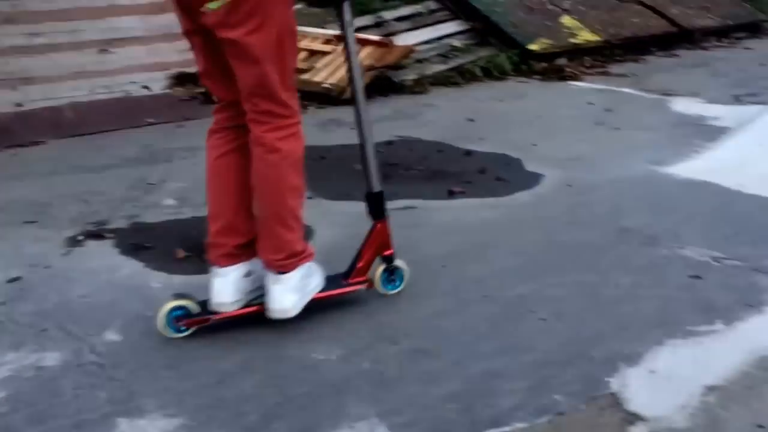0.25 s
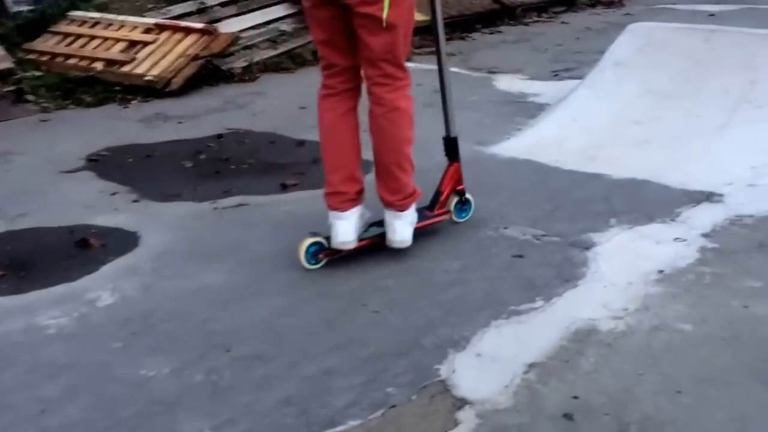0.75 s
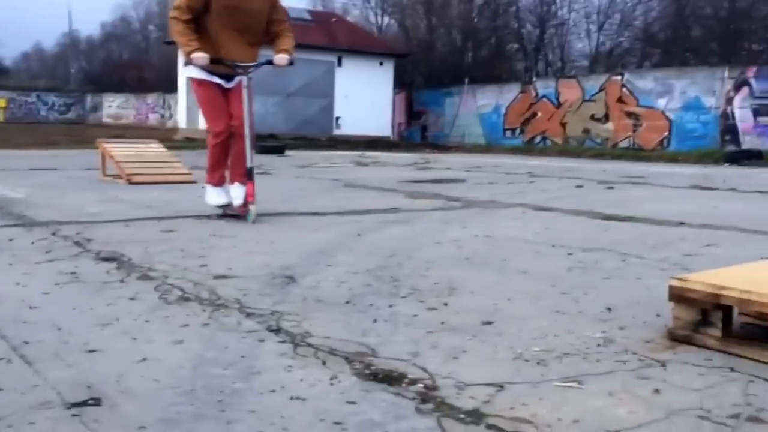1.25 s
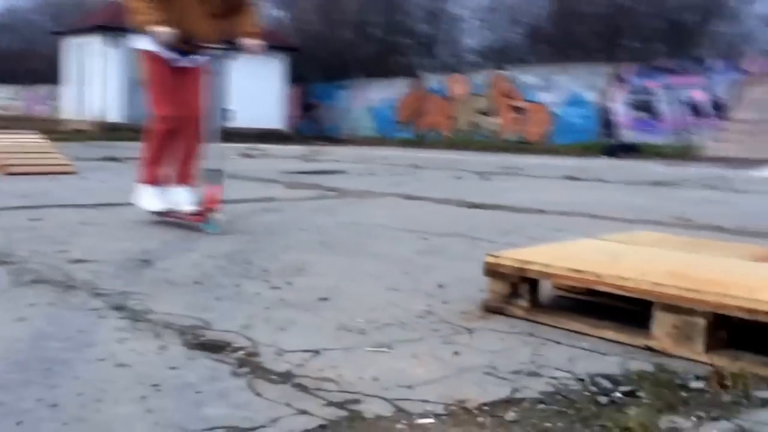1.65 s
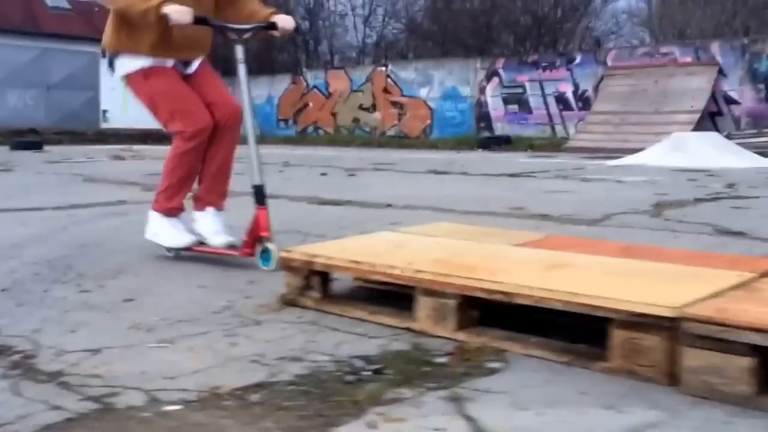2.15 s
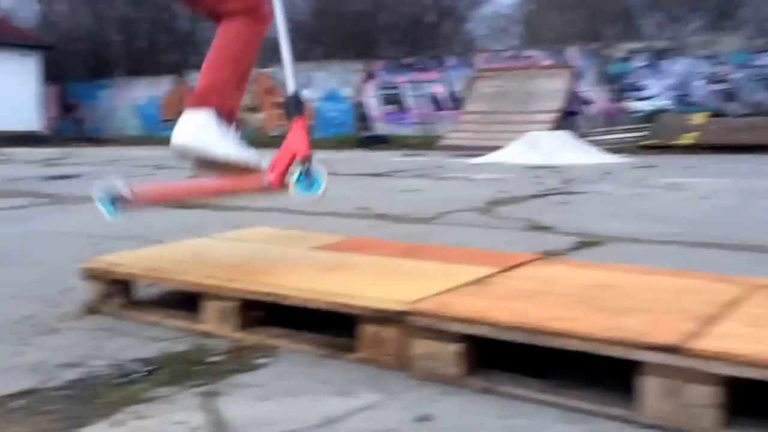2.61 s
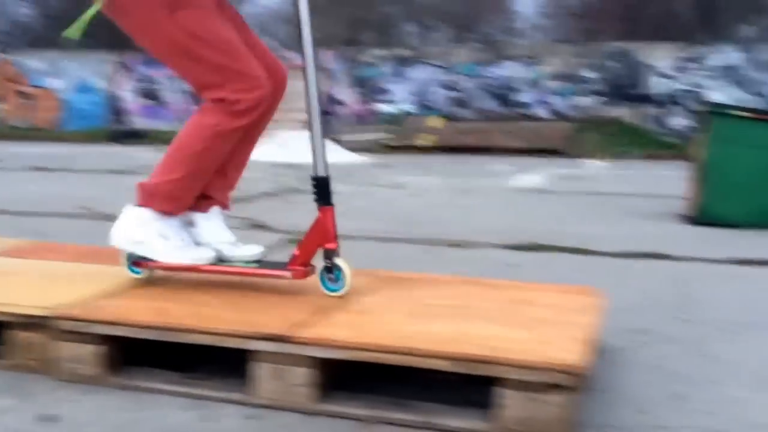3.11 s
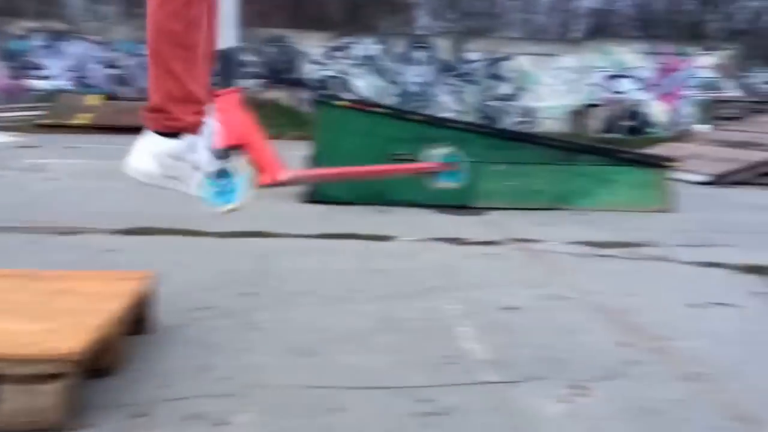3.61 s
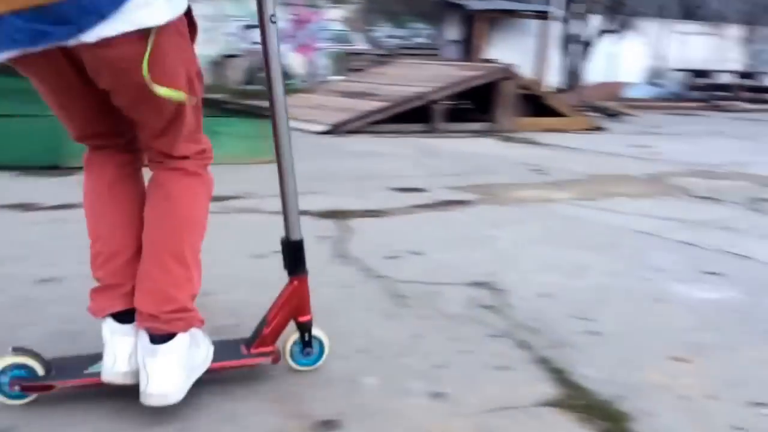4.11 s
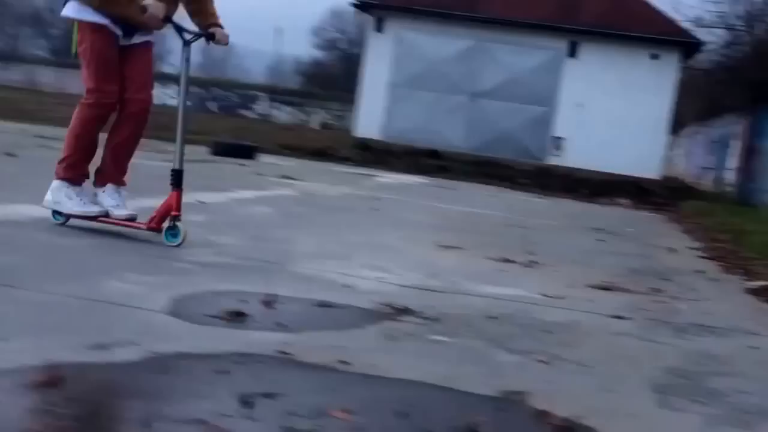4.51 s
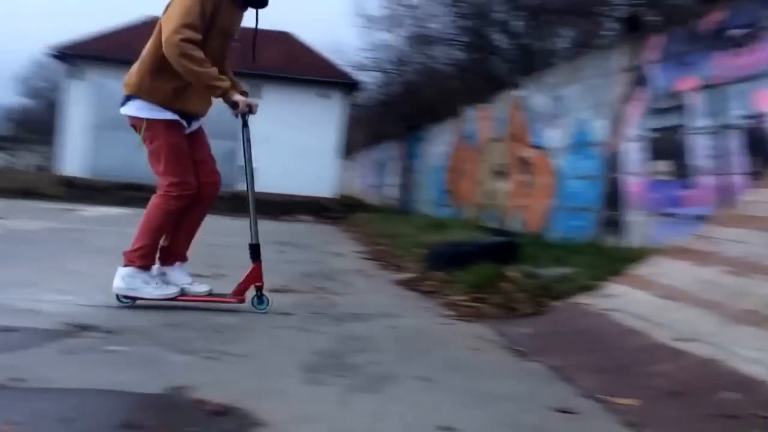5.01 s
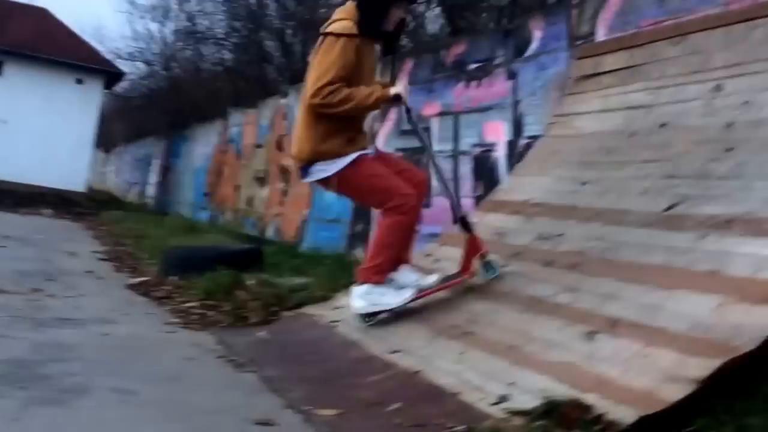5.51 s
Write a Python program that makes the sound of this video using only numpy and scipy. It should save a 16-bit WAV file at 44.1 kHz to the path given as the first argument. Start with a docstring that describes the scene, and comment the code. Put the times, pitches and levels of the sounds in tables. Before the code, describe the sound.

In an open yard with faint background noise, a stunt scooter is heard close and dry. From 0 to 1 s it rolls softly, with bright grit ticks, tiny scrapes and a barely audible thin squeak near 0.47 s. From 1 to 2.2 s low bumps over cracks and a light bearing whir continue. At 2.3 s it hops, the metal frame rattling, and lands at about 2.75 s with a hollow woody clack and knock on pallets. Boards drone, with bumps near 3.1 s and a knock at 3.4 s. A second jump at 3.5 s jangles unevenly, then a hard cracking landing hits asphalt at 3.96-4.0 s. Crunchy ticks and a strong low thump follow at 4.3-4.5 s, then steadier gritty rolling. At 5.3 s a sharp knock meets the plank ramp; from 5.45 s heavy booming thuds and deep rumble, the loudest part, last to the end. Short dull echoes follow the hits.

```python
"""A stunt scooter rolls over rough asphalt in an open yard, hops onto wooden pallets, drops off and runs up a plank ramp.
From the start, shaped noise and random clicks give rumble, drone, frame shake, whir and grit over the yard's faint noise.
Bursts of hiss tick, decaying sines bump, and a thin falling sine squeaks once, early on.
In the jumps rattles excite the frame's modes; landings knock and ring pallet, then asphalt, then ramp.
Ticks, jolts and landings return as dull, delayed echoes from ground and walls."""
import sys
import numpy as np
from scipy import signal
from scipy.fft import rfft, irfft, next_fast_len
from scipy.io import wavfile

SR = 44100
rng = np.random.default_rng(int(sys.argv[2]) if len(sys.argv) > 2 else 0)


def waveform_to_disk(signal):
    """Save audio, clipped to [-1, 1], as 16-bit WAV at the path in sys.argv[1]."""
    frames = np.transpose(np.atleast_2d(signal))
    scaled = np.clip(frames, -1, 1) * 32767
    samples = np.round(scaled).astype(np.int16)
    wavfile.write(sys.argv[1], SR, samples)


N = 253575

# colour of crushed grit, shared by crunch, ticks and cracks: frequency_hz, relative_db
GRIT_SPECTRUM = [(2000, -9), (3500, -6.5), (5200, -1), (6000, -1.5), (7700, 0.5), (9000, -3), (12500, -6.5),
                 (14800, -10), (15600, -4)]
# course of the grit and the bearing whir: time_s, grit_db, whir_db
CRUNCH_COURSE = [(0, -62.5, -58), (.27, -53, -62), (.3, -71, -64), (1, -66.5, -69), (1.6, -69.5, -63),
                 (2.05, -61.5, -53.5), (2.28, -65.5, -52.5), (2.32, -60.5, -56.5), (2.72, -59, -55.5),
                 (2.9, -71, -61), (3.07, -73, -64), (3.11, -64.5, -59), (3.4, -58.5, -55),
                 (3.5, -45, -45.5), (3.62, -56.5, -59), (3.92, -59.5, -58), (4.04, -43, -50),
                 (4.2, -54.5, -61), (4.26, -62, -61), (4.3, -45.5, -44.5), (4.5, -45.5, -54),
                 (4.53, -56, -64), (4.62, -55, -52), (4.85, -53.5, -52), (5.28, -47.5, -49),
                 (5.42, -51.5, -54), (5.55, -58, -55), (5.75, -61.5, -61)]


def amp(db):
    """Level law: decibels to an amplitude ratio."""
    return 10 ** (np.asarray(db, float) / 20)


def rms_one(x):
    """Normalization: divides a signal by its root mean square."""
    return x / np.sqrt(np.mean(x ** 2) + 1e-20)


def drift(rate_hz):
    """Low-pass noise: a double pole leaves slow random swings of rms 1."""
    r = np.exp(-2 * np.pi * rate_hz / SR)
    noise = rng.standard_normal(N + SR)
    settled = signal.lfilter([1], [1, -2 * r, r * r], noise)[SR:]
    return rms_one(settled)


def colour(x, spectrum):
    """Spectral shaping: weights the Fourier components of x, then sets its rms to 1."""
    hz, db = np.transpose(spectrum)
    size = next_fast_len(N)
    f = np.maximum(np.arange(size // 2 + 1) * SR / size, 1)
    gain = amp(np.interp(np.log(f), np.log(hz), db))
    return rms_one(irfft(rfft(x, size) * gain, size)[:N])


def band(x, low_hz, high_hz):
    """Band-pass filtering: keeps the part between two corner frequencies."""
    return signal.sosfilt(signal.butter(2, [low_hz, high_hz], "band", fs=SR, output="sos"), x + 1e-18)


def soften(x, order, corner_hz):
    """Low-pass filtering: rounds off a blow by removing its treble."""
    return signal.sosfilt(signal.butter(order, corner_hz, fs=SR, output="sos"), x + 1e-18)


def ring(force, hz, t60):
    """Damped resonance: a unit click starts a sine of initial height 1 that falls 60 dB in t60 seconds."""
    r, w = amp(-60 / (t60 * SR)), 2 * np.pi * hz / SR
    return signal.lfilter([0, np.sin(w)], [1, -2 * r * np.cos(w), r * r], force + 1e-18)


def grains(per_s, spread_db):
    """Random impact train: clicks of either sign at chance times; spread_db makes their sizes uneven."""
    sizes = amp(spread_db * np.minimum(rng.exponential(1, N), 4)) * rng.choice([-1, 1], N)
    return sizes * (rng.random(N) < per_s / SR)


def fading(times_s, db, t60_s, rise_s):
    """Exponential decay: sums envelopes that rise at each time and die away."""
    out = np.zeros(N)
    for s, peak, decay in zip(times_s, amp(db), t60_s):
        decay = max(decay, .002)
        i, t = round(s * SR), np.arange(round(1.5 * decay * SR)) / SR
        envelope = peak * (1 - np.exp(-t / rise_s)) * amp(-60 * t / decay)
        out[i:i + len(t)] += envelope[:N - i]
    return out


def in_time(rows):
    """Linear interpolation: spreads each level column over the samples."""
    s, *columns = np.transpose(rows)
    return [np.interp(np.arange(N) / SR, s, c) for c in columns]


def yard_noise():
    """Stationary noise: a fixed spectrum gives the faint background of the open yard."""
    # colour of the yard: frequency_hz, relative_db
    yard_spectrum = [(18, -33), (30, -28), (93, -3.5), (152, -2.5), (328, -7.5), (383, -6), (1250, -14.5),
                     (1880, -16), (2920, -34), (4400, -26.5), (14000, -48)]
    return amp(-55.5) * colour(rng.standard_normal(N), yard_spectrum)


def scrapes():
    """Sliding friction: grinding over patches of grit lifts the level, in dB, with a quick edge at each end."""
    # wheels or shoes grind over grit: start_s, length_s, rise_db
    patches = [(.005, 0.021, 8), (0.061, 0.016, 15), (0.207, 0.014, 15), (0.242, 0.023, 8.5),
               (.435, 0.018, 6), (0.547, .022, 20.5), (0.646, 0.039, 17), (0.774, 0.017, 14.5),
               (1.146, 0.039, 13), (1.356, 0.061, 21), (1.696, 0.039, 12), (1.926, 0.02, 7),
               (2.297, 0.045, 15), (2.354, 0.026, 7), (2.45, 0.044, 10), (2.606, 0.045, 4),
               (2.941, 0.023, 12), (2.988, .02, 7.5), (3.11, 0.04, 11), (3.195, 0.027, 8.5),
               (3.519, 0.072, 9), (3.68, 0.099, 8.5), (4.364, .04, 10), (4.476, 0.044, 1.5),
               (4.551, 0.057, 12.5), (5.569, 0.069, 10.5)]
    edge_s = 0.0024
    t = np.arange(N) / SR
    rise_db = np.zeros(N)
    for s, length, db in patches:
        corners = [s - edge_s, s, s + length, s + length + 2 * edge_s]
        rise_db += db * np.interp(t, corners, [0, 1, 1, 0])
    return rise_db


def frame(force, flicker_db):
    """Modal response: the hollow deck, fork and bar ring, each mode under its own randomly flickering force."""
    # modes of the metal frame: frequency_hz, relative_db, t60_s
    frame_modes = [(560, 0.5, 0.029), (645, -1.5, 0.069), (974, 0.5, 0.028), (1156, 3.5, 0.029),
                   (1400, -0.5, 0.019), (1590, -4, 0.04), (1896, -5.5, 0.027), (2480, -1, 0.0082),
                   (2906, -10, 0.064), (3660, -4.5, 0.013), (3860, -32, 0.46), (834.5, -10, 0.14)]
    out = np.zeros(N)
    for k, (hz, db, t60) in enumerate(frame_modes):
        flicker = amp(db + flicker_db * drift(29.6))
        out += (-1) ** k * flicker * ring(force, hz, t60)
    return out


def rolling():
    """Roughness excitation: stones under the wheels drive rumble, board drone, frame shake, whir and grit."""
    # colour of the ground rumble: frequency_hz, relative_db
    rumble_spectrum = [(25, -26), (45, 7.5), (70, 13.5), (110, 7.5), (160, 7), (230, -4.5), (400, -74)]
    # colour of the drone of the boards: frequency_hz, relative_db
    drone_spectrum = [(100, -22), (160, 9.5), (200, 7), (320, 3.5), (450, -2.5), (800, -8), (1300, -48.5)]
    # colour of the broad part of the shake: frequency_hz, relative_db
    shake_spectrum = [(300, 3), (500, 11.5), (1000, 5), (1600, 10.5), (2200, -51)]
    # colour of the bearing whir: frequency_hz, relative_db
    whir_spectrum = [(1500, -19), (2100, -7), (2550, -2), (2820, -1.5), (2900, 7.5), (2990, 0.5),
                     (3650, -6.5), (4200, -16), (5500, -18)]
    # course of the rumble and the drone above it: time_s, rumble_db, drone_db
    load_course = [(0, -47.5, -62), (.95, -51, -58), (1.1, -44, -55), (1.55, -55, -59.5), (1.9, -44, -50.5),
                   (2.2, -47, -47.5), (2.31, -72, -45), (2.45, -61, -63), (2.72, -48, -50),
                   (2.9, -50, -46.5), (3.06, -42, -56.5), (3.11, -44, -42), (3.38, -38, -32),
                   (3.505, -36, -33), (3.53, -48, -41), (3.6, -44, -62), (3.72, -74, -69), (3.94, -83, -49),
                   (4.05, -29.5, -49), (4.15, -39, -45.5), (4.25, -49, -64), (4.31, -37, -44.5),
                   (4.55, -50, -48), (4.85, -39.5, -46), (5.28, -42.5, -42), (5.37, -33, -26),
                   (5.42, -27, -30), (5.5, -10.5, -24.5), (5.6, -16, -27), (5.7, -15.5, -30.5),
                   (5.75, -23, -35)]
    # course of the frame shake: time_s, shake_db
    shake_course = [(0, -54), (1, -56.5), (1.6, -57), (2.02, -54), (2.27, -50.5), (2.3, -34.5), (2.45, -33),
                    (2.62, -47.5), (2.72, -41), (2.9, -57), (3.06, -66), (3.11, -53), (3.38, -45),
                    (3.51, -37), (3.53, -31.5), (3.66, -36), (3.92, -44), (4.05, -46), (4.12, -61),
                    (4.55, -55), (4.65, -45), (4.83, -43), (5.28, -39.5), (5.4, -40), (5.55, -47),
                    (5.75, -46)]

    rumble_db, drone_db = in_time(load_course)
    shake_db, = in_time(shake_course)
    grit_db, whir_db = in_time(CRUNCH_COURSE)
    rise_db = scrapes()
    grit_db = grit_db + rise_db
    whir_db = whir_db + 0.53 * rise_db  # the whir follows a scrape by about half

    lumps, patches, swells = drift(32), drift(55), drift(11.3)
    low_sway_db = 2.0 * lumps + 1.2 * swells
    rumble = colour(rng.standard_normal(N), rumble_spectrum) * amp(rumble_db + low_sway_db)
    drone = colour(rng.standard_normal(N), drone_spectrum) * amp(drone_db + low_sway_db)

    stones = rms_one(grains(4000, spread_db=2.5))
    modal_shake = amp(-2.5) * rms_one(frame(stones, flicker_db=5.0))
    broad_shake = amp(-8.5) * colour(stones, shake_spectrum)
    shake = (modal_shake + broad_shake) * amp(shake_db + 0.49 * lumps + 2.4 * swells)

    whir = colour(grains(2000, spread_db=1.5), whir_spectrum)
    whir = whir * amp(whir_db + 2.0 * patches + 0.6 * swells)
    crunch = rms_one(grains(980, spread_db=3.5)) + 0.87 * rng.standard_normal(N)
    grit = colour(crunch, GRIT_SPECTRUM) * amp(grit_db + 3.14 * patches + 2.1 * swells)
    return rumble + drone + shake + whir + grit


def small_ticks():
    """Poisson arrivals: fainter ticks fall at random, their levels tied to the grit's course."""
    per_s, over_grit_db, t60_s = 19, 10.5, 0.024
    when, size, pitch = rng.random((150, 3)).T
    s = np.cumsum(-np.log(1 - when)) / per_s
    course_s, grit_db = np.transpose(CRUNCH_COURSE)[:2]
    db = np.interp(s, course_s, grit_db) + over_grit_db + 8 * size
    hz = 5000 + 4000 * pitch
    return [(a, b, c, t60_s) for a, b, c in zip(s, db, hz) if a < N / SR - .13]


def ticks():
    """Resonant impact: loose parts and stones give a burst of hiss with a wide and a faint narrow peak."""
    # loose parts and stones tick: start_s, relative_db, centre_hz, t60_s
    tick_rows = [(.062, -28.5, 6830, .045), (0.073, -22.5, 6870, 0.023), (.132, -26.5, 6660, 0.045),
                 (.1615, -32, 7200, 0.033), (.179, -28, 4930, 0.028), (0.206, -29.5, 5230, 0.066),
                 (0.2432, -22.5, 6600, 0.059), (.2694, -26, 5260, .014), (0.446, -37, 5600, .026),
                 (0.9269, -28.5, 3840, 0.019), (1.1428, -35, 9940, 0.045), (1.3618, -31, 7900, 0.018),
                 (1.671, -39.5, 6000, 0.048), (1.708, -33.5, 4000, 0.081), (2.015, -34, 4100, 0.099),
                 (2.144, -41.5, 7460, 0.028), (2.2036, -39, 6040, .04), (2.306, -32, 5300, 0.076),
                 (2.377, -31, 5560, 0.054), (2.5144, -32, 5500, 0.045), (2.8275, -38.5, 10800, 0.066),
                 (2.9382, -37.5, 6170, 0.023), (3.496, -33, 7600, 0.073), (3.522, -38, 6030, .04),
                 (3.628, -37.5, 5920, 0.08), (3.731, -30.5, 6140, 0.11), (3.7562, -23.5, 4930, 0.05),
                 (3.9502, -15, 4200, 0.077), (3.951, -11.5, 4940, 0.04), (4.1558, -28, 6950, .03),
                 (4.211, -31.5, 8750, 0.031), (4.285, -24.5, 9900, .013), (4.308, -14, 7650, 0.031),
                 (4.354, -23.5, 4960, .017), (4.37, -21, 8100, .035), (4.384, -23, 7700, 0.016),
                 (4.433, -27.5, 9050, 0.033), (4.4543, -29, 8650, 0.022), (4.4924, -27, 7800, 0.045),
                 (4.552, -24, 7700, .03), (4.574, -24, 7660, 0.031), (4.8516, -27.5, 8400, 0.017),
                 (4.9445, -28, 6350, .015), (4.973, -29, 9400, 0.053), (5.001, -26, 9300, 0.023),
                 (5.0789, -38.5, 8260, 0.11), (5.11, -29, 5650, .033), (5.6138, -34, 6740, 0.06)]
    out, hiss = np.zeros(N), colour(grains(9000, spread_db=7.5), GRIT_SPECTRUM)
    t = np.arange(SR // 8) / SR
    edge = (1 + 0.62 * np.exp(-t / 0.00073)) * (1 - np.exp(-t / 0.00072))  # a sharp click at the front
    for s, db, hz, t60 in list(tick_rows) + small_ticks():
        i = round(s * SR)
        burst = hiss[i:i + len(t)] * amp(db - 60 * t / t60) * edge
        wide, narrow = ring(burst, hz, 0.00039), ring(burst, hz, 0.0077)
        out[i:i + len(t)] += 0.12 * burst + 0.22 * wide + 0.051 * narrow
    return out


def bumps():
    """Damped oscillation: a soft push on tyre and ground gives a few low cycles and a dull knock."""
    # wheels over cracks and seams: start_s, level_db, pitch_hz
    bump_rows = [(.07, -29.5, 191), (0.559, -38, 190), (.68, -35, 256), (1.065, -30.5, 61.9),
                 (1.168, -24, 74.4), (1.202, -23.5, 101), (1.256, -27.5, 62), (1.37, -28.5, 71.6),
                 (1.441, -23.5, 415), (1.497, -31, 72), (1.675, -29, 126), (1.781, -28, 157),
                 (1.913, -34, 76), (1.999, -37, 64), (2.096, -27, 216), (2.203, -28, 270),
                 (2.301, -22, 149), (2.933, -29, 202), (3.095, -22.5, 135), (3.112, -17.5, 298),
                 (3.194, -24, 182), (4.03, -36, 90), (4.302, -29, 186), (4.366, -10, 101.4),
                 (4.49, -26, 102), (5.081, -30, 86.6)]
    cycles = 8.5  # periods in which a bump falls 60 dB
    knock_db, knock_t60_s = -14.5, 0.045  # level relative to the bump
    out, t = np.zeros(N), np.arange(SR // 4) / SR
    for s, db, hz in bump_rows:
        i = round(s * SR)
        envelope = amp(db - 60 * t * hz / cycles) * (1 - np.exp(-t / 0.0015))
        out[i:i + len(t)] += envelope * np.sin(2 * np.pi * hz * t)
    s, db, _ = np.transpose(bump_rows)
    knock = fading(s, db + knock_db, np.full(len(s), knock_t60_s), rise_s=0.0029)
    return out + knock * rms_one(band(rng.standard_normal(N), 160, 740))


def squeak():
    """Frequency glide: the phase of a thin falling sine is the running sum of its frequency."""
    # the squeak, one row: start_s, end_s, from_hz, to_hz, peak_db
    glide = (0.455, 0.495, 7700, 6900, -60)
    start, end, from_hz, to_hz, db = glide
    part = np.clip((np.arange(N) / SR - start) / (end - start), 0, 1)
    phase = 2 * np.pi * np.cumsum(from_hz + (to_hz - from_hz) * part) / SR
    return amp(db) * np.sin(np.pi * part) * np.sin(phase)


def jolts():
    """Forced modal vibration: short rattles at uneven gaps excite the frame as the deck spins in a jump."""
    # jumps: start_s, length_s, first_jolt_relative_db
    jumps = [(2.297, .36, -23), (3.52, .38, -20)]
    # the hardest jolts, heard one by one: start_s, relative_db
    hard_jolts = [(2.322, -19), (2.435, -29), (2.482, -26.5), (2.515, -28), (2.607, -23), (2.629, -24.5),
                  (3.522, -18), (3.55, -20.5), (3.62, -19), (3.68, -19), (3.75, -20.5), (3.783, -24),
                  (3.82, -27)]
    gap_s, t60_s, fade_db_per_s, spread_db = 0.041, 0.04, 34.5, 4
    rows = list(hard_jolts)
    for start, span, first_db in jumps:
        gap, size = rng.random((30, 2)).T
        after = gap_s * (np.cumsum(0.408 + 1.2 * gap) - .4 - 1.31 * gap[0])  # the first falls near the start
        db = first_db - fade_db_per_s * after - spread_db * size
        rows += [(start + a, b) for a, b in zip(after, db) if a < span]
    s, db = np.transpose(rows)
    envelope = fading(s, db, np.full(len(s), t60_s), rise_s=0.0054)
    rattle = rms_one(grains(6000, spread_db=0.0))
    return amp(-25) * frame(envelope * rattle, flicker_db=4.5)


def landings(start, end, body, soft_hz, snap_hz):
    """Impact excitation: a snap and a rattle, dying faster in the treble, ring the frame; a soft push rings the body."""
    # blows of wheels and deck, levels relative:
    # start_s, knock_db, clack_db, crack_db, body_db, snap_db
    blows = [(2.742, -8, -9, -17, -15.5, -5.5), (2.747, -13, -7.5, -20.5, -38, -6.5),
             (2.759, -25, -42, -58, -21, -24), (2.777, -2.5, -38, -32, -10.5, -9.5),
             (2.863, -28, -47, -51, -30, -39), (3.198, -25, -30, -49, -35, -34),
             (3.4125, -8, -38, -37, -21, -3.5), (3.9585, -9.5, -33, -18, -14, -4),
             (3.98, -13, -7.5, -18.5, -10.5, -11), (3.984, -6, -17, -16, -4.5, -16),
             (3.993, -21, -15, -20.5, -9.5, -16), (4.004, -14, -23, -31, -27, -20),
             (4.015, -21, -20, -30, -34, -27), (4.3645, -32.5, -50, -42, -15, -36),
             (5.307, -29, -17.5, -17.5, -34, -36), (5.328, -4.5, -10.5, -15, -25, 1.5),
             (5.446, -8, -22, -28, -19, -19), (5.451, -2.5, -11, -15, -6, -3.5),
             (5.469, -11.5, -14.5, -28.5, -3, -16), (5.578, -14, -25, -31.5, -24.5, -37),
             (5.665, -24, -34, -44.5, -14.5, -47)]
    core_lag_s = .0015  # low rattle, snap and body push start slightly after the treble rattle and crack
    chosen = [row for row in blows if start < row[0] < end]
    s, knock_db, clack_db, crack_db, body_db, snap_db = np.transpose(chosen)
    t60_s = np.full(len(s), 0.035)
    core_s = s + core_lag_s
    at = np.round(core_s * SR).astype(int)

    rattle = rms_one(grains(5000, spread_db=-0.5))
    low = fading(core_s, knock_db, 1.5 * t60_s, rise_s=0.00175) * rattle
    high = fading(s, clack_db, t60_s, rise_s=0.0025) * rattle
    snap, push = np.zeros((2, N))
    snap[at], push[at] = amp(snap_db + 21), amp(body_db)
    snap = soften(band(snap, 290, 2670), 4, snap_hz)

    knock = amp(11.5) * band(band(low, 230, 860), 246, 3750)
    clack = amp(8.5) * band(high, 1500, 3140)
    frame_ring = amp(-34.5) * frame(high + 0.64 * snap, flicker_db=2.0)
    crack = fading(s, crack_db, 1.1 * t60_s, rise_s=0.00097) * colour(rng.standard_normal(N), GRIT_SPECTRUM)

    push = soften(push, 2, soft_hz)
    body_ring = np.zeros(N)
    for k, (hz, db, t60) in enumerate(body):
        body_ring += (-1) ** k * amp(db + 0.5) * ring(push, hz, t60)
    return knock + clack + snap + frame_ring + crack + body_ring


def reflections(hits):
    """Specular reflection: ground and walls return delayed copies with softened treble."""
    # echoes: delay_s, relative_db
    echo_rows = [(.011, -15.5), (.023, -19.5), (.041, -26), (.067, -33.5), (0.107, -34.5)]
    dull, echoes = signal.lfilter([.4], [1, -.6], hits), np.zeros(N)
    for s, db in echo_rows:
        delay = round(s * SR)
        echoes[delay:] += amp(db) * dull[:N - delay]
    return echoes


def scene():
    """Superposition: sums the sources and the echoes of ticks, jolts and landings."""
    # modes of the wooden pallets: frequency_hz, relative_db, t60_s
    pallet = [(125, 1, 0.078), (206.5, 4, 0.15), (322, 6, 0.067), (366, 8, 0.042), (494, -5.5, 0.035),
              (776, 2.5, 0.018)]
    # modes of the asphalt ground: frequency_hz, relative_db, t60_s
    asphalt = [(68.5, -4.5, 0.046), (115, 3, 0.042), (165, 1, 0.037), (328, -3, 0.049)]
    # modes of the plank ramp: frequency_hz, relative_db, t60_s
    ramp = [(63.5, 2.5, 0.19), (80, 4.5, 0.15), (111.5, -5, 0.57), (163.6, 3, 0.084), (241, -7, 0.16),
            (332, -16.5, 0.16), (448, -22, 0.042)]
    pallet_from_s, asphalt_from_s, ramp_from_s = 2.7, 3.6, 5.25  # what the blows fall on
    hits = ticks() + jolts()
    hits += landings(pallet_from_s, asphalt_from_s, pallet, soft_hz=940, snap_hz=2300)
    hits += landings(asphalt_from_s, ramp_from_s, asphalt, soft_hz=610, snap_hz=3440)
    hits += landings(ramp_from_s, N / SR, ramp, soft_hz=700, snap_hz=2400)
    return (yard_noise() + rolling() + hits + reflections(hits) + bumps() + squeak())[None]


def record(dry):
    """Band limiting and saturation: the microphone drops the deepest bass, peaks are rounded, the top is cut."""
    x = signal.sosfilt(signal.butter(2, 35, "high", fs=SR, output="sos"), dry)
    rounded = 1.05 * np.tanh(x / 1.05)
    return signal.sosfilt(signal.cheby2(16, 70, 15900, fs=SR, output="sos"), rounded)  # 70 dB down from 15900 Hz


dry = scene()
out = record(dry)
waveform_to_disk(out)
```